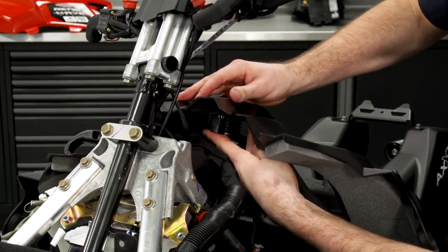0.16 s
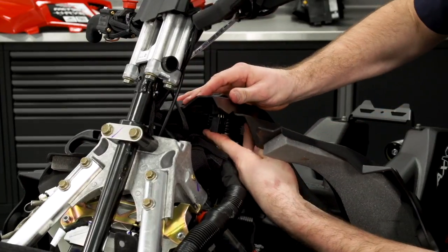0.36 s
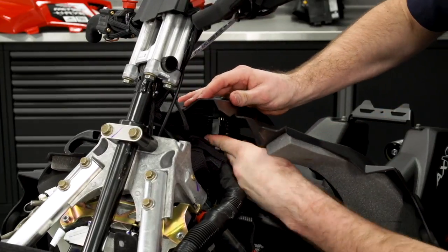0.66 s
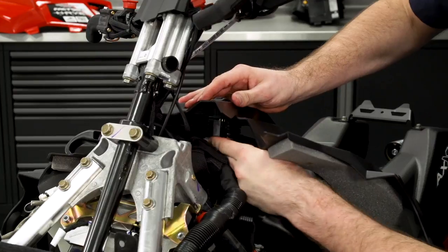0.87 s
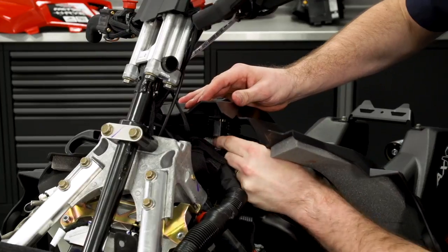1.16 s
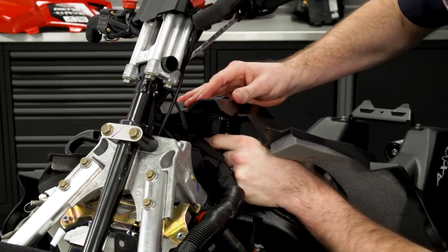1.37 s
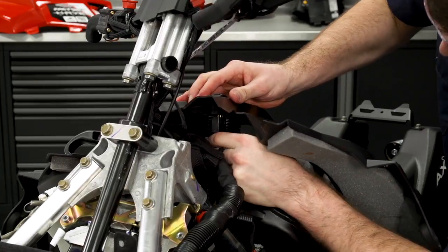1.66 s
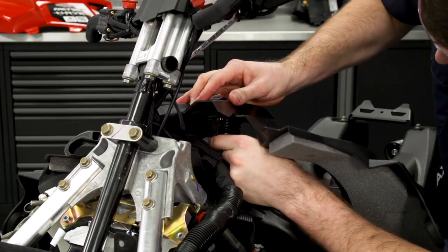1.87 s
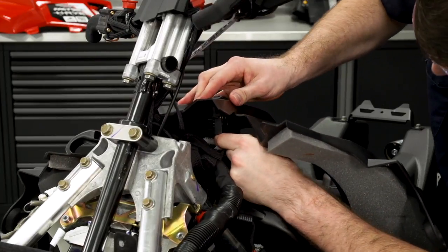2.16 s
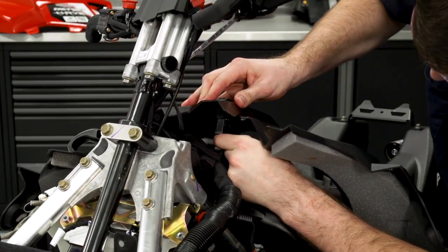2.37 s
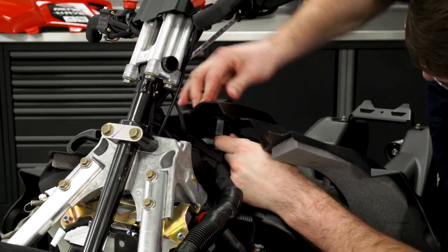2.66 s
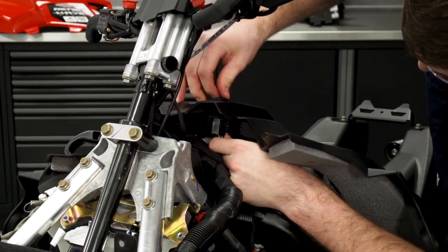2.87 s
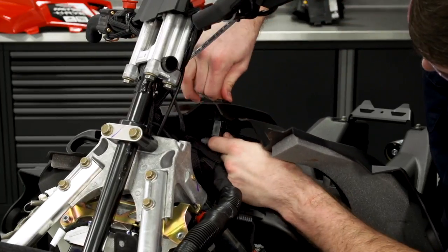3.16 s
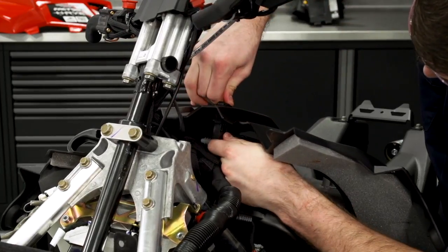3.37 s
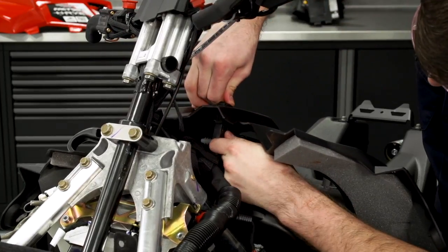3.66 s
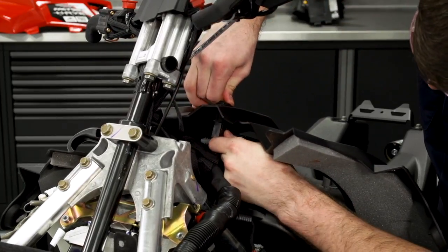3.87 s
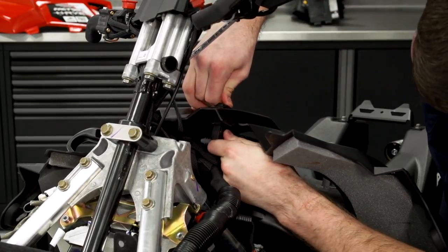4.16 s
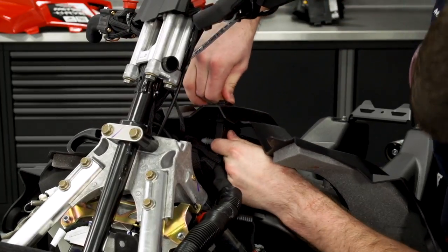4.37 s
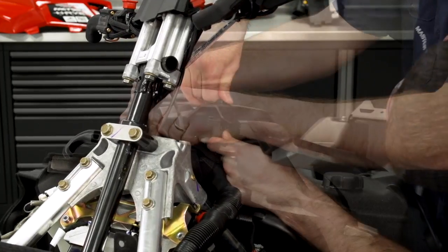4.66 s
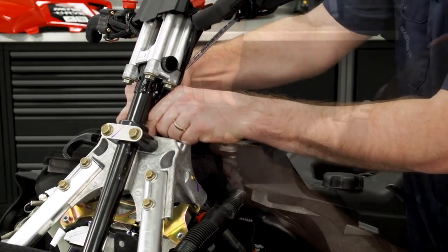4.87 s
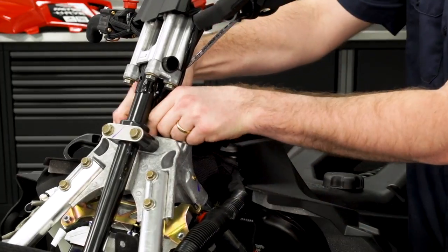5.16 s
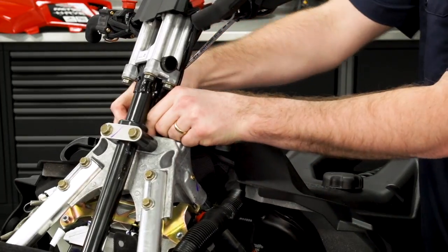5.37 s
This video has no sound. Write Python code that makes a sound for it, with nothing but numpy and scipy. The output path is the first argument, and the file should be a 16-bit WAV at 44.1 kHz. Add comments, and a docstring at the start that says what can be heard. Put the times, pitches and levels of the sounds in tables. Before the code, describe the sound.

Faint plastic rustling and dull taps, a few small ticks, a sharp crisp latch click with room ring, then soft rubbing and a panel drag.

```python
"""A hand knocks and rubs a plastic panel; then two hands push a wiring connector onto a switch behind it.
Small parts tick, and the latch snaps home: short blows ring the connector and panel, and the room rings on.
A sleeve brushes past and the panel judders under a new grip: many tiny random slips, shaped into rubbing,
hiss and low ringing. Faint filtered noise is the workshop air. One microphone, louder on the left."""
import sys
import numpy as np
from scipy import signal
from scipy.fft import rfft, irfft
from scipy.io import wavfile
from scipy.ndimage import uniform_filter1d

SR = 44100
rng = np.random.default_rng(int(sys.argv[2]) if len(sys.argv) > 2 else 0)


def int16_out(signal):
    """Quantize to a 16-bit WAV file."""
    q = np.round(np.clip(np.atleast_2d(signal).T, -1, 1) * 32767)
    wavfile.write(sys.argv[1], SR, q.astype(np.int16))


N = 243017
TIME = np.arange(N) / SR
RING_TIME = TIME[:SR // 4]

# Levels are relative: later mixing and panning can shift them. t60 is the time to fade by 60 dB.
# the latch slips over its ramp, seats and rebounds:
# (time [s], level [dB], contact cut-off [Hz], crack level [dB], crack t60 [s])
LATCH_BLOWS = [(3.9469, -21, 8960, -6.5, 0.0085), (3.9478, -6, 7140, -12.5, 0.015),
               (3.9494, -2, 4420, -26.5, .012), (3.9513, -4.5, 9100, -24.5, 0.019),
               (3.954, -10, 3540, -20.5, .012)]
# ringing of the connector housing and the switch: (frequency [Hz], level [dB], t60 [s])
CONNECTOR_MODES = [(2254, -16, 0.013), (2750, -11, 0.028), (3220, -9, 0.021), (3460, -2.5, 0.037),
                   (3830, -13.5, 0.023), (4060, -13, 0.029), (4420, -17, 0.013), (4906, -9, 0.02),
                   (5670, -16, 0.0171), (7300, -19, 0.015), (7800, -30, .016), (10220, -15, 0.016),
                   (13800, -13, .008)]
# ringing of the plastic panel that carries them: (frequency [Hz], level [dB], t60 [s])
PANEL_MODES = [(204, -33, 0.096), (446, -13.5, 0.068), (754, -6.5, 0.031), (900, -12, 0.06),
               (1070, -7, 0.044), (1437, -8, 0.031), (1678, -3, 0.03), (1978, -5.5, .017)]
# what the snap sends out in all directions together: (frequency [Hz], level [dB])
SNAP_SPECTRUM = [(100, -10.5), (200, 1), (300, -2.5), (450, -0.5), (1100, -1), (1600, -1), (2100, -9),
                 (2750, 1), (3450, 6.5), (4100, 2.5), (4900, -4), (7000, -10.5), (10000, -15.5),
                 (15000, -22.5)]
# small hard parts touching:
# (time [s], peak [dB], ring frequency [Hz], ring over crack [dB], crack centre [Hz], crack and ring t60 [s])
PART_TICKS = [(.002, -47, 990, 5, 1100, 0.14), (2.5765, -29.5, 4400, -10, 8500, 0.01),
              (2.607, -28, 5420, -10, 8300, 0.012), (3.169, -35, 1730, 2.5, 2500, 0.042),
              (3.2546, -27, 1670, -5, 3410, 0.019), (3.345, -35, 2380, 3, 4350, 0.0096),
              (3.601, -49, 2220, 4, 2500, .008), (4.2105, -33, 3900, 3, 4380, 0.0089),
              (4.865, -48, 12400, -2, 9520, 0.015), (5.337, -46.5, 1860, 0, 2210, .016),
              (5.373, -34.5, 1110, 10, 1000, .015)]
# fingers and wiring knocking the panel: (time [s], peak [dB], contact cut-off [Hz])
PANEL_KNOCKS = [(.002, -32.5, 603), (.294, -43.5, 696), (.474, -46, 1210), (.678, -53, 600),
                (.875, -50, 687), (1.316, -41.5, 1110), (1.451, -48.5, 600), (1.477, -40, 960),
                (1.846, -42, 1560), (2.196, -44.5, 990), (2.422, -45, 930), (2.5766, -47, 2000),
                (2.6067, -39.5, 2000), (2.647, -44.5, 700), (2.683, -39, 690), (2.699, -39.5, 600),
                (2.726, -31.5, 1100), (2.966, -41.5, 853), (3.169, -38, 1400), (3.2555, -31.5, 900),
                (4.635, -45.5, 1500), (4.816, -42, 1617), (5.374, -43, 696), (5.463, -45.5, 700)]
# soft, dull bumps of the hand and panel, and the low boom of the snap:
# (time [s], peak [dB], frequency [Hz])
LOW_BUMPS = [(1.356, -37.5, 283), (1.364, -41, 133), (1.48, -40, 524), (2.45, -39, 134), (2.577, -44, 65),
             (2.606, -40.5, 60), (2.692, -37, 191), (2.71, -35, 138), (3.257, -42.5, 100), (3.56, -45, 162),
             (3.952, -37.5, 203), (3.953, -32.5, 50), (4.042, -36.5, 132), (4.283, -39.5, 129),
             (5.381, -38, 88)]
# a hand leans on the panel and flexes it: (time of greatest effort [s], length [s], level [dB])
HAND_PRESSES = [(.01, .24, -46.5), (0.518, 0.71, -57.5), (1.16, .1, -57), (1.38, 0.13, -51),
                (1.504, 0.2, -53), (1.757, .35, -59), (2.247, 0.25, -53), (2.45, .2, -50.5),
                (2.736, 0.33, -49), (3.001, 0.18, -58.5), (3.91, .12, -61.5), (4.374, 0.37, -49),
                (4.93, .18, -58), (5.14, 0.35, -54.5), (5.40, .16, -42.5)]
# fingers, forearm or sleeve slide over the plastic:
# (time of greatest effort [s], length [s], stick-slip rubbing level [dB], skin and cloth hiss level [dB])
HAND_RUBS = [(.005, 0.17, -57.5, -75.5), (0.397, 0.12, -67, -72), (0.673, 0.075, -52.5, -65),
             (0.958, .24, -65, -84), (1.101, 0.19, -60, -72.5), (1.236, 0.077, -65.5, -75.5),
             (1.348, 0.18, -60, -64.5), (1.5, .18, -63.5, -93), (1.862, 0.1, -59.5, -73),
             (1.994, 0.34, -67.5, -74.5), (2.185, 0.088, -61.5, -74), (2.312, 0.15, -58.5, -72),
             (2.425, 0.093, -54.5, -74), (2.709, 0.12, -52, -70), (2.81, 0.15, -63.5, -76),
             (3.018, .08, -56.5, -70), (3.208, 0.34, -60.5, -75.5), (3.755, 0.064, -65.5, -83.5),
             (4.351, 0.15, -55, -68), (4.47, 0.47, -64, -65), (4.86, 0.6, -65, -68.5),
             (4.958, 0.078, -51.5, -66.5), (5.166, 0.31, -63.5, -85.5), (5.37, 0.16, -51, -71)]
# colour of pushing: (frequency [Hz], level [dB])
PUSH_SPECTRUM = [(25, -24.5), (60, -2.5), (135, -0.5), (220, -5.5), (330, -11), (600, -20), (1500, -52.5)]
# colour of rubbing: (frequency [Hz], level [dB])
RUB_SPECTRUM = [(100, -14.5), (300, 0), (520, 5.5), (900, 1.5), (1600, -6.5), (2400, -11), (4200, -19),
                (7000, -32), (15000, -48)]
# colour of sliding skin and cloth: (frequency [Hz], level [dB])
SLIDE_SPECTRUM = [(500, -19.5), (1500, 8), (3000, 1), (5000, 2.5), (8000, -3), (11000, 0.5), (14000, 0),
                  (16000, -4)]
# light strokes of a fingertip or wire:
# (time [s], length [s], level [dB], centre frequency [Hz], width [Hz])
LIGHT_STROKES = [(0.807, 0.065, -65.5, 12000, 5000), (0.898, 0.16, -68.5, 2270, 3400),
                 (1.055, 0.12, -65, 1580, 1750), (1.291, 0.12, -63.5, 14000, 4000),
                 (1.921, 0.16, -67.5, 1960, 2120), (5.14, 0.026, -63, 3500, 5000)]
# the panel dragging under the grip: (time [s], level [dB])
DRAG_LEVELS = [(5.37, -61), (5.385, -40.5), (5.41, -39), (5.44, -44), (5.46, -47.5), (5.51, -47.5)]
# ringing of the dragged panel: (frequency [Hz], level [dB], t60 [s])
DRAGGED_PANEL_MODES = [(82, -4, 0.091), (200, -3, 0.063), (271, -5.5, 0.11), (356, 0, 0.09),
                       (481.5, -1, 0.089), (640, -4, 0.033), (1050, -12, 0.014)]
# the workshop's reverberation: (frequency [Hz], level [dB], t60 [s])
ROOM_BANDS = [(149.2, -9, 0.76), (600, -14, 1.6), (2003, -18.5, 1.6), (3440, -15.5, 1.38),
              (5960, -21, 0.84), (15000, -19.5, 0.328)]
# colour of the still air in the workshop: (frequency [Hz], level [dB])
AIR_SPECTRUM = [(15, -43), (25, -7.5), (169, -5), (267, -12), (469, -14), (598, -20), (684, -14),
                (804, -20.5), (1300, -23), (2700, -32), (2920, -35.5), (15500, -44)]

SEAT_S = 3.9512  # the connector seats
CRACK_WIDTH = 1.32  # bandwidth of a tick over its centre frequency
REBOUND_S, REBOUND_DB = 0.012, -20.5  # mean gap between rebounds, and change in level at each
BUMP_T60_S = 0.073
SWELL_SHARE = 0.39  # share of a hand movement spent swelling
# between movements the hands still hold the panel: level [dB] of flexing, rubbing and hiss
HOLD_PUSH_DB, HOLD_RUB_DB, HOLD_HISS_DB = -64, -69, -83
STIR_PER_S, STIR_DB = 12, 2.5  # random stirring of that hold: points per second, typical change
# the resting hands are quieter before and after the snap: (from [s], to [s]), change in level
STILL_S, STILL_DB = (3.4, 4.28), -6.5
AIR_DB = -61.5
LEFT_DB = 6.5  # left channel over right
TOP_HZ = 15900  # upper limit of the recorder


def undb(db):
    """Turn decibels into gain."""
    return 10 ** (np.asarray(db) / 20)


def unit(x):
    """Scale to an average (rms) level of 1."""
    return x / np.sqrt(np.mean(x ** 2))


def peaked(x, db):
    """Scale to a peak level."""
    return x * undb(db) / np.abs(x).max()


def fade(t, t60):
    """Die away exponentially, by 60 dB in t60 seconds."""
    return np.exp(-np.log(1000) * t / t60)


def add(out, s, x):
    """Mix x into out from time s."""
    i = max(int(s * SR), 0)
    out[i:i + len(x)] += x[:max(N - i, 0)]


def colour(x, points):
    """Shape x by a spectrum of (frequency [Hz], level [dB]) points."""
    hz, db = np.transpose(points)
    f = np.maximum(np.fft.rfftfreq(len(x), 1 / SR), 1)
    gain = undb(np.interp(np.log(f), np.log(hz), db))
    return irfft(rfft(x) * gain, len(x))


def soften(x, hz):
    """A soft contact passes little above its cut-off."""
    return signal.sosfilt(signal.butter(2, hz, fs=SR, output="sos"), x)


def band(x, hz, width):
    """Keep a band of frequencies around a centre."""
    low = np.hypot(hz, width / 2) - width / 2
    high = min(low + width, SR / 2 - 1000)
    return signal.sosfilt(signal.butter(2, [low, high], "band", fs=SR, output="sos"), x)


def ring(modes, scatter_db=0):
    """A blow sets off fading tones (modes); their shares vary with the place that is struck."""
    shares = undb(scatter_db * rng.standard_normal(len(modes)))
    out = np.zeros(len(RING_TIME))
    for k, (hz, db, t60) in enumerate(modes):
        tone = np.sin(2 * np.pi * hz * RING_TIME) * fade(RING_TIME, t60)
        out += (-1) ** k * shares[k] * undb(db) * tone  # neighbouring modes start in opposite directions
    return out


def crack(hz, width, t60):
    """A short noise burst stands for many dense, heavily damped modes; longer ones build up more slowly."""
    build_up = 1 - np.exp(-RING_TIME / (.015 * t60))
    noise = unit(band(rng.standard_normal(len(RING_TIME)), hz, width))
    return noise * build_up * fade(RING_TIME, t60)


def slips(rate, spread_db, size=N):
    """Stick-slip: tiny releases of uneven size at random moments, rate per second on average."""
    sizes = undb(spread_db * np.minimum(rng.exponential(size=size), 4))
    happens = rng.random(size) < rate / SR
    return happens * sizes * rng.choice([-1, 1], size)


def snap():
    """Each blow of the latch rings the housing; the seating blow also shakes the panel."""
    out = np.zeros(N)
    housing = undb(-7.0) * ring(CONNECTOR_MODES)
    for s, db, contact_hz, crack_db, t60 in LATCH_BLOWS:
        burst = undb(crack_db) * crack(hz=4470, width=4000, t60=t60)
        add(out, s, undb(db) * (soften(housing, contact_hz) + burst))
    add(out, SEAT_S, undb(-13.5) * ring(PANEL_MODES))
    return out


def snap_into_room():
    """Summed over all directions the snap's sharp peaks blend into one smooth, bright pulse."""
    pulse = np.zeros(N)
    add(pulse, SEAT_S, np.ones(1))
    return undb(15.5) * colour(pulse, SNAP_SPECTRUM)


def ticks():
    """Terminals, clips and wire ends touch hard plastic: a crack, one clear tone, and two small rebounds."""
    out = np.zeros(N)
    for s, db, ring_hz, ring_db, crack_hz, t60 in PART_TICKS:
        tone = np.sqrt(2) * ring([(ring_hz, ring_db, t60)])
        tick = tone + crack(crack_hz, CRACK_WIDTH * crack_hz, t60)
        gap = REBOUND_S * rng.uniform(.8, 1.2)
        for k in range(3):
            add(out, s + k * gap, peaked(tick, db + k * REBOUND_DB))
    return out


def knocks():
    """Blunt contacts ring the panel and scuff it briefly, before a soft contact dulls them."""
    out = np.zeros(N)
    for s, db, contact_hz in PANEL_KNOCKS:
        grains = unit(slips(rate=3000, spread_db=2, size=len(RING_TIME)))
        scuff = band(grains * fade(RING_TIME, t60=.04), hz=1100, width=6200)
        blow = ring(PANEL_MODES, scatter_db=1) + undb(9.0) * scuff
        add(out, s, peaked(soften(blow, contact_hz), db))
    return out


def low_bumps():
    """Dull bumps and the snap's boom: one low tone and a noise burst around it fade together."""
    out = np.zeros(N)
    for s, db, hz in LOW_BUMPS:
        tone = ring([(hz, 0, BUMP_T60_S)])
        burst = undb(-2.0) * crack(hz, hz * 1.7, BUMP_T60_S)
        add(out, s, peaked(tone + burst, db))
    return out


def rustle():
    """Hands push the panel, fingers stick and slip on it, skin and cloth hiss as they slide."""
    push, rub, hiss = efforts()
    grains = slips(rate=700, spread_db=3.0)
    panel = unit(signal.fftconvolve(grains, ring(PANEL_MODES))[:N])  # every slip rings the panel
    rubbing = unit(unit(colour(grains, RUB_SPECTRUM)) + undb(-15.0) * panel)
    pushing = unit(colour(slips(rate=500, spread_db=2.5), PUSH_SPECTRUM))
    sliding = unit(colour(slips(rate=4300, spread_db=3.5), SLIDE_SPECTRUM))
    return undb(-1.5) * push * pushing + undb(0.5) * rub * rubbing + undb(4.0) * hiss * sliding


def efforts():
    """How hard the hands push, rub and hiss: their movements on top of a hold that stirs a little."""
    hold = holding()
    push = sum(undb(db) * swell(s, length) for s, length, db in HAND_PRESSES)
    rub = sum(undb(db) * swell(s, length) for s, length, db, _ in HAND_RUBS)
    hiss = sum(undb(db) * swell(s, length) for s, length, _, db in HAND_RUBS)
    push = np.hypot(push, undb(HOLD_PUSH_DB) * hold)
    rub = np.hypot(rub, undb(HOLD_RUB_DB) * hold)
    hiss = np.hypot(hiss, undb(HOLD_HISS_DB) * hold)
    return push, rub, hiss


def swell(s, length):
    """The effort of one hand movement: up to its peak at time s, then down again."""
    start = s - SWELL_SHARE * length
    return np.interp(TIME, [start, s, start + length], [0, 1, 0])


def holding():
    """Resting hands stir at random, and are quieter before and after the snap."""
    moments = np.arange(256) / STIR_PER_S
    stir = np.interp(TIME, moments, rng.standard_normal(len(moments)))
    is_still = (TIME > STILL_S[0]) & (TIME < STILL_S[1])
    still = uniform_filter1d(1. * is_still, size=SR // 10)  # ease in and out over 0.1 s
    return undb(STIR_DB * stir + STILL_DB * still)


def strokes():
    """Each light stroke swells and dies as a dense run of tiny slips with its own colour."""
    out = np.zeros(N)
    for s, length, db, hz, width in LIGHT_STROKES:
        envelope = np.hanning(int(length * SR)) ** .5
        grains = unit(band(slips(rate=2400, spread_db=-1, size=SR), hz, width))
        add(out, s, undb(db) * envelope * grains[:len(envelope)])
    return out


def judder():
    """The gripped panel drags in uneven slips that ring its low modes and scuff its skin."""
    grains = slips(rate=400, spread_db=0.5)
    body = unit(signal.fftconvolve(grains, ring(DRAGGED_PANEL_MODES))[:N])
    scuff = unit(band(grains, hz=890, width=680))
    level_db = np.interp(TIME, *np.transpose(DRAG_LEVELS), left=-np.inf)  # silent before the drag
    return (body + undb(-17) * scuff) * undb(level_db)


def workshop(x):
    """Cabinets and bench scatter a quick flurry of echoes, over a diffuse tail whose treble dies first."""
    t = TIME[:2 * SR]
    hz, db, t60 = np.transpose(ROOM_BANDS)
    noise = rfft(rng.standard_normal(len(t)))
    log_f = np.log(np.maximum(np.fft.rfftfreq(len(t), 1 / SR), 1))
    response = np.zeros(len(t))
    for k, share in enumerate(np.eye(len(ROOM_BANDS))):  # each band blends into its neighbours
        decay = fade(t, t60[k])
        band_noise = irfft(noise * np.interp(log_f, np.log(hz), share), len(t))
        response += undb(db[k]) * band_noise * decay / np.linalg.norm(decay)
    response *= np.clip((t - .009) / 0.0042, 0, 1)  # the tail starts late and fades in
    flurry = soften(rng.standard_normal(len(RING_TIME)), hz=7040) * fade(RING_TIME, t60=0.098)
    add(response, .0135, undb(-23.5) * flurry / np.linalg.norm(flurry))
    return signal.fftconvolve(x, response)[:N]


def still_air():
    """Steady random noise, strongest in the bass, is the quiet air of the workshop."""
    return undb(AIR_DB) * unit(colour(rng.standard_normal(N), AIR_SPECTRUM))


def scene():
    """All the handling, its room and the still air, at one microphone panned to the left."""
    handling = ticks() + knocks() + low_bumps() + rustle() + strokes() + judder()
    direct = handling + snap()
    echoes = workshop(handling + snap_into_room())
    pan = undb([[LEFT_DB], [0]])
    return (direct + echoes + still_air()) * pan / pan.mean()


def record(dry):
    """The recorder cuts the top: a steep filter removes what lies above its upper limit."""
    return signal.sosfilt(signal.ellip(8, .2, 70, TOP_HZ, fs=SR, output="sos"), dry)


dry = scene()
out = record(dry)
int16_out(out)
```